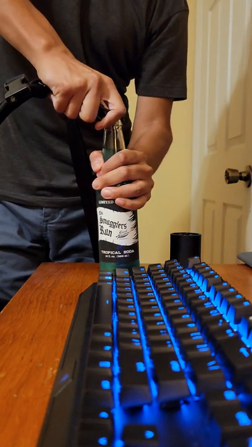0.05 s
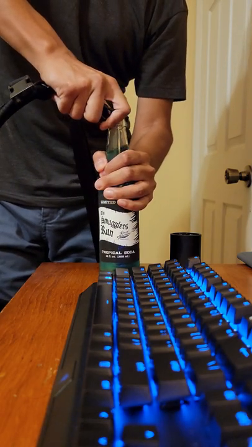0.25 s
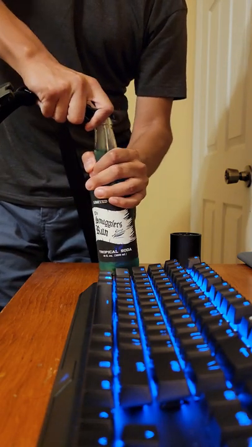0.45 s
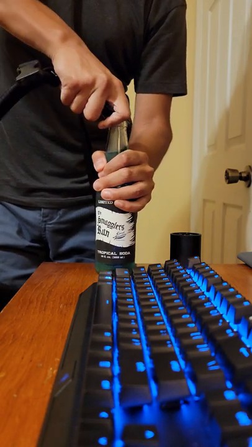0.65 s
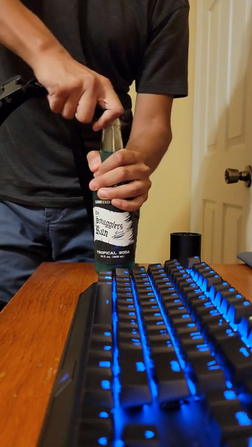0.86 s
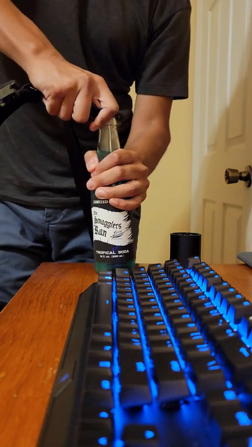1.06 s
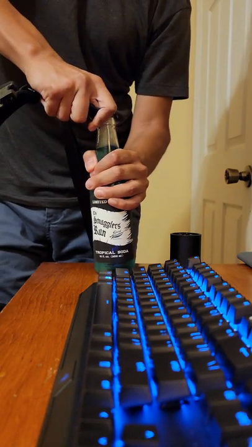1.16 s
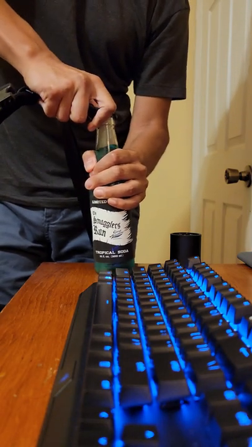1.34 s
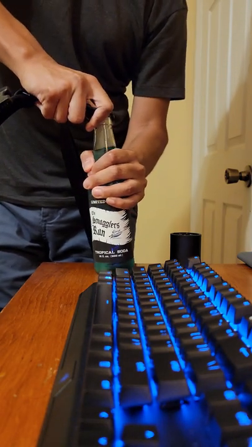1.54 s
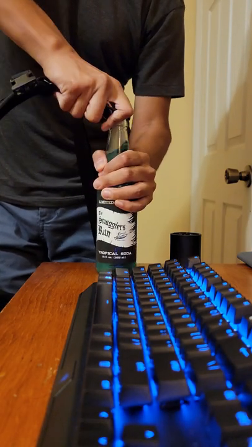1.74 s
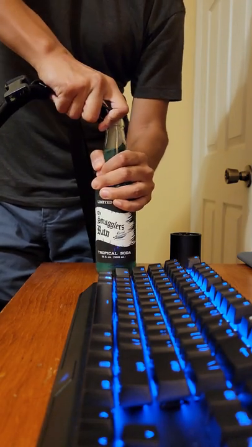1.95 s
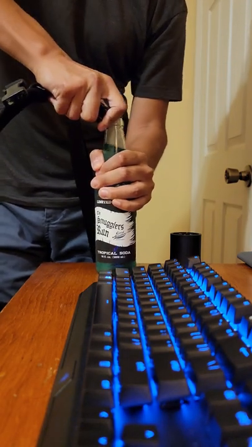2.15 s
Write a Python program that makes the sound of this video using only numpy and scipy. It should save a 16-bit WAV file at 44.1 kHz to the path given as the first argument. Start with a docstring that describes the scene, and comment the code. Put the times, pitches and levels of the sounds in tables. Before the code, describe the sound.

A glass soda bottle is opened: gas hisses briefly and bursts out with a loud, hollow pop at about 0.25 seconds. Around 0.75 seconds the metal opener clinks and the bottle knocks on a wooden desk, followed by a faint leak. At 1.75 seconds the cap snaps up with a short puff, another clink and a light knock. A fan hums faintly throughout in the small room.

```python
"""A fan hums in a small room; then gas hisses past the crown cap of a glass soda bottle and bursts out
with a pop that rings the air in the neck. A second pull of the opener lets out a faint leak, and a third
snaps the cap up with a last puff. The gas is turbulent noise, coloured by narrow ringing peaks.
The steel opener ticks and clinks, and the bottle knocks on a wooden desk, exciting its damped modes.
Nearby surfaces add early reflections, and the room a short reverberant tail."""
import sys
import numpy as np
from scipy import signal
from scipy.io import wavfile

SR = 44100
rng = np.random.default_rng(int(sys.argv[2]) if len(sys.argv) > 2 else 0)


def pcm_store(signal):
    """Save signal as 16-bit PCM."""
    levels = np.round(np.clip(np.atleast_2d(signal), -1, 1) * 32767)
    wavfile.write(sys.argv[1], SR, levels.astype(np.int16).T)


N = 97020
T = np.arange(N) / SR
EDGES_HZ = np.geomspace(22, 17000, 33)
CENTRES_HZ = np.sqrt(EDGES_HZ[1:] * EDGES_HZ[:-1])

def from_db(db):
    """Amplitude ratio: a factor of ten per 20 dB."""
    return 10 ** (np.asarray(db) / 20)

def per_band(points):
    """Interpolation over log frequency, read at the band centres."""
    hz, value = np.transpose(points)
    return np.interp(np.log(CENTRES_HZ), np.log(hz), value)

def pan(db):
    """Constant-power panning, with the left side db above the right."""
    gains = from_db([[db / 2], [-db / 2]])
    return gains / np.sqrt(np.mean(gains ** 2))

# Coherence of the sound field. Each row: frequency in Hz, left-right correlation.
COHERENCE = [(150, 0.93), (300, 0.27), (650, -0.52), (1400, -0.8), (3000, -0.23), (7000, -0.22)]
# Interchannel level difference. Each row: frequency in Hz, left minus right in dB.
BALANCE = [(100, -2.5), (200, -1.5), (400, -3.5), (1300, -5.5), (2500, -1), (5200, -5.5), (9500, 2),
           (15000, -1.5)]
def noise_bands():
    """Partially coherent stereo noise from mid and side signals: bands x 2 x N, each band of rms 1."""
    white, bands = rng.standard_normal((2, 2, N + SR // 2)), []
    for k, (alike, lean_db) in enumerate(zip(np.clip(per_band(COHERENCE), -1, 1), per_band(BALANCE))):
        bandpass = signal.butter(2, EDGES_HZ[k:k + 2], "band", fs=SR, output="sos")
        mid, side = signal.sosfilt(bandpass, white[k % 2])[:, -N:]
        pair = np.sqrt(1 + alike) * mid + np.sqrt(1 - alike) * side * [[1], [-1]]
        bands.append(pan(lean_db) * pair / pair.std())
    return np.array(bands)

def weights(spectrum, tilt_db=0):
    """Band power is density times bandwidth; the gains are scaled to a total power of 1."""
    gains = from_db(per_band(spectrum) + tilt_db * np.log2(CENTRES_HZ)) * np.sqrt(np.diff(EDGES_HZ))
    return gains / np.linalg.norm(gains)

def hiss(bands, spectrum, tilt_db=0):
    """Stationary noise by superposition of weighted bands."""
    return np.tensordot(weights(spectrum, tilt_db), bands, 1)

def shaped(bands, gains, envelopes):
    """Nonstationary noise: each band follows its own envelope."""
    return np.einsum("b,bn,bcn->cn", gains, envelopes, bands)

def age(start):
    """Seconds since start, zero before it."""
    return np.maximum(T - start, 0)

def onset(start, attack_s=.0007):
    """A first-order step response."""
    return 1 - np.exp(-age(start) / attack_s)

def burst(start, decay_s):
    """A transient: quick attack, exponential decay."""
    return onset(start) * np.exp(-age(start) / decay_s)

def ring(start, hz, t60):
    """Free vibration of a damped oscillator, falling 60 dB in t60 seconds."""
    return np.sin(2 * np.pi * hz * age(start)) * from_db(-60 * age(start) / t60)

def resonance(x, hz, width_hz):
    """Forced response of a two-pole resonator with a peak gain of 1."""
    r = np.exp(-np.pi * width_hz / SR)
    feedback = [1, -2 * r * np.cos(2 * np.pi * hz / SR), r * r]
    return (1 - r * r) / 2 * signal.lfilter([1, 0, -1], feedback, x + 1e-18)

# Fan and mains tones. Each row: frequency in Hz, rms level in dB.
HUM_TONES = [(59.2, -50.5), (118.4, -60), (145.3, -63), (251, -77), (346, -77)]
# Room noise. Each row: frequency in Hz, relative spectral density in dB.
FLOOR_SPECTRUM = [(15, -48.5), (25, -29.5), (47, -7), (70, -5), (84, -14.5), (127, -2.5), (157, -27.5),
                  (190, -20), (249, -23.5), (714, -35.5), (1230, -40), (16000, -69)]
def fan(waver=.14):
    """Fan and mains tones with slow amplitude modulation, over low noise with a faint resonance."""
    knots, hum = np.linspace(0, T[-1], num=24), 0
    for hz, db in HUM_TONES:
        tone = np.sqrt(2) * np.sin(2 * np.pi * (hz * T + rng.random()))
        drift = np.interp(T, knots, rng.standard_normal(len(knots)))
        hum += from_db(db) * tone * (1 + waver * drift)
    air = from_db(-52.5) * hiss(noise_bands(), FLOOR_SPECTRUM)
    whir = from_db(1) * resonance(air, hz=1185, width_hz=100)
    return pan(-1.2) * hum + air + whir

# Reverberation time. Each row: frequency in Hz, T60 in seconds.
ROOM_T60 = [(150, 0.55), (1000, .38), (5000, .38), (9000, .27), (15000, 0.19)]
def reverberation(x, level_db=-28, gap_s=.008):
    """Convolution with a diffuse tail, whose treble is absorbed soonest."""
    decay = from_db(-60 * T / per_band(ROOM_T60)[:, None]) * onset(gap_s)
    tail = shaped(noise_bands(), np.sqrt(np.diff(EDGES_HZ)), decay)
    tail /= np.sqrt(np.sum(tail ** 2) / 2)
    return from_db(level_db) * signal.fftconvolve(x, tail, axes=1)[:, :N]

# Echoes off desk, body and wall. Each row: left delay and right delay in seconds, gain in dB.
REFLECTIONS = [(.0011, 0.0018, -9.5), (.0046, .0039, -11), (.0083, .0097, -12), (0.0169, .0171, -16.5)]
def early_reflections(x, above_hz=1390):
    """Comb filtering: delayed treble interferes with the direct sound, differently on each side."""
    treble = signal.sosfilt(signal.butter(2, above_hz, "high", fs=SR, output="sos"), x)
    for *lags, db in REFLECTIONS:
        delayed = [np.pad(side, (int(lag * SR), 0))[:N] for side, lag in zip(treble, lags)]
        x = x + from_db(db) * np.array(delayed)
    return x

def desk_mode(start, hz, t60, lag_s=.0007, lag_above_hz=300):
    """Level and time differences place a mode to the right; high modes reach the left side late."""
    lag = lag_s / (1 + (lag_above_hz / hz) ** 4)
    lean_db = np.interp(hz, *np.transpose(BALANCE))
    return pan(lean_db) * np.array([ring(start + lag, hz, t60), ring(start, hz, t60)])

# Impacts on the desk: the jolt of the pop, then the bottle knocking twice. Each row: start in seconds, modal
# level in dB, contact cutoff in Hz, thud level in dB.
KNOCKS = [(.2625, -16.5, 260.2, -47.5), (0.7448, -24.5, 615, -27.5), (1.8107, -28.5, 1220, -30)]
# Modes of the desk. Each row: frequency in Hz, relative level in dB, T60 in seconds.
DESK_MODES = [(88, -3, .14), (147.2, 0, 0.22), (215, -4, 0.18), (253, -9, .2), (347.5, 0.5, 0.16),
              (446, -9.5, .1), (546.2, 2, .11), (620, -8.5, .1)]
# Contact noise. Each row: frequency in Hz, relative spectral density in dB.
THUD_SPECTRUM = [(30, -19.5), (70, -4.5), (150, -4.5), (380, -2.5), (650, 0), (1100, -17), (1800, -16),
                 (3500, -31.5), (8000, -58.5)]
def desk_knocks(bands, thud_s=.019):
    """Impact excitation: the pop jolts the desk and the bottle thuds on it, and a softer contact drives high
    modes less."""
    out, thud = 0, hiss(bands, THUD_SPECTRUM)
    for start, db, cutoff_hz, thud_db in KNOCKS:
        wood = sum(from_db(db + mode_db) / np.hypot(1, hz / cutoff_hz) * desk_mode(start, hz, t60)
                   for hz, mode_db, t60 in DESK_MODES)
        out += wood * onset(start) + from_db(thud_db) * thud * burst(start, thud_s)
    return out

# Slips of the opener. Each row: start in seconds, level in dB, tilt in dB per octave.
TICKS = [(0.7413, -23.5, -3.5), (0.809, -31.5, -12), (0.8409, -39.5, 7), (1.361, -65, 2), (1.43, -71, 12),
         (1.808, -30, 0), (1.855, -45, 0.5), (2.091, -67, 2), (2.117, -74, 13), (2.163, -72, 11)]
# Noise of a slip. Each row: frequency in Hz, relative spectral density in dB.
TICK_SPECTRUM = [(300, -28), (1000, 4), (1400, 11.5), (1800, -10), (2300, -2), (3100, -6), (4500, -4),
                 (8000, -15), (15000, -92)]
def opener_ticks(bands, decay_s=.003):
    """Contact transients of the opener on the cap, heavily damped by the hand."""
    return sum(from_db(db) * hiss(bands, TICK_SPECTRUM, tilt_db) * burst(start, decay_s)
               for start, db, tilt_db in TICKS)

# Slips that ring the opener. Each row: start in seconds, level in dB.
CLINKS = [(0.7426, -32.5), (0.8125, -44), (0.8443, -50.5), (0.891, -46), (1.386, -70), (1.81, -38),
          (2.044, -65.5)]
# Modes of the opener. Each row: frequency in Hz, relative level in dB, T60 in seconds.
OPENER_MODES = [(1141, -7.5, 0.058), (1616, -6.5, 0.036), (1796, 2, 0.022), (2615, -9.5, 0.032),
                (3094, -12.5, 0.064)]
def opener_clinks():
    """Free vibration: the steel rings briefly in its modes when it slips."""
    return sum(from_db(db + mode_db) * ring(start, hz, t60)
               for start, db in CLINKS for hz, mode_db, t60 in OPENER_MODES)

def opener_rub(noise, gain_db=-3):
    """Forced vibration: noise passed through the opener's modes stands for its rubbing on the cap."""
    return sum(from_db(gain_db + db) * resonance(noise, hz, width_hz=77) for hz, db, _ in OPENER_MODES)

# Soft swells of hiss and one brief scrape. Each row: peak time in seconds, level in dB,
# Gaussian rise and fall widths in seconds, tilt in dB per octave.
SWELLS = [(0.67, -66, 0.025, 0.15, 1), (0.859, -49.5, 0.11, 0.043, -3.5), (.893, -50, 0.0027, 0.0099, -0.5),
          (0.903, -57.5, 0.044, 0.046, 1.5), (1.5, -68, 0.04, 0.017, -2), (1.94, -61.5, 0.059, 0.041, -1),
          (2.06, -64.5, 0.039, .03, -3.5)]
# Noise of the swells. Each row: frequency in Hz, relative spectral density in dB.
SWELL_SPECTRUM = [(150, 1), (350, 14.5), (800, 5), (1700, 6), (2600, 5), (4200, -3.5), (6500, 1.5),
                  (9000, -36), (11500, -12), (15000, -16)]
def hiss_and_scrape(bands, fizz_db=4, spurt_s=.0019):
    """Random amplitude modulation makes soft swells of hiss and one brief scrape splutter."""
    spurts = np.interp(T / spurt_s, np.arange(N), rng.uniform(-1, 1, N))
    out = 0
    for peak, db, rise, fall, tilt_db in SWELLS:
        swell = np.exp(-.5 * ((T - peak) / np.where(T < peak, rise, fall)) ** 2)
        out += from_db(db) * swell * hiss(bands, SWELL_SPECTRUM, tilt_db)
    return out * from_db(fizz_db * spurts)

# Releases of the crimp. Each row: start in seconds, crack and puff levels in dB,
# tilt in dB per octave, left minus right in dB.
SNAPS = [(1.7507, -20.5, -30.5, -0.37, -3), (1.7616, -20.5, -31, 0.4, 1.5)]
# Noise of a snap. Each row: frequency in Hz, relative spectral density in dB.
SNAP_SPECTRUM = [(70, -45), (170, -12.5), (380, 5), (900, -3.5), (1350, 2.5), (2000, -6), (3200, -0.5),
                 (4700, -8), (6000, -4), (9000, -18), (12000, -21), (15500, -17)]
def cap_snaps(bands, crack_s=.0028, fall_db_per_s=340):
    """Sudden release of stress: the crimp yields in two steps, each a crack and a puff of gas."""
    out = 0
    for start, crack_db, puff_db, tilt_db, pan_db in SNAPS:
        crack = from_db(crack_db) * burst(start, crack_s)
        puff = onset(start) * from_db(puff_db - fall_db_per_s * age(start))
        out += pan(pan_db) * hiss(bands, SNAP_SPECTRUM, tilt_db) * (crack + puff)
    return out

# Narrow ringing peaks that colour the hiss. Each row: frequency in Hz, gain in dB.
HISS_PEAKS = [(3483, -5), (3690, -3.5), (4025, 2), (4255, 5.5), (4738, -4.5), (5305, -2), (5487, -7),
              (6052, 7.5), (6208, 1), (9499, 3.5), (10144, 5.5), (10645, 6), (12619, 3.5), (13989, 4.5)]
def ringing_peaks(noise):
    """Resonant filtering: narrow ringing peaks colour the hiss."""
    return noise + sum(from_db(db) * resonance(noise, hz, width_hz=30) for hz, db in HISS_PEAKS)

# Pressure pulses in the neck. Each row: start in seconds, level in dB.
NECK_PULSES = [(0.2519, -27), (0.2598, -12), (1.7506, -24), (1.762, -33)]
# Modes of the enclosed air. Each row: frequency in Hz, relative level in dB, T60 in seconds.
NECK_MODES = [(1293, 0, .14), (1255, -12, .1), (1360, -7, .06)]
def neck(left_lag_s=.00025):
    """Cavity resonance: pressure pulses draw a hollow note from the air above the drink."""
    sides = [sum(from_db(db + mode_db) * ring(start + lag, hz, t60)
                 for start, db in NECK_PULSES for hz, mode_db, t60 in NECK_MODES)
             for lag in (left_lag_s, 0)]
    return pan(-1.5) * np.array(sides)

POP_S, POP_CRACK_S = .259, .002   # when the seal gives way, and the time constant of its crack
# Hiss at its height. Each row: frequency in Hz, relative spectral density in dB.
SQUEEZE_SPECTRUM = [(80, -3.5), (400, -9.5), (900, -10), (2500, -10.5), (5000, -3), (7000, 0), (9000, -11),
                    (11000, -6), (13500, -5), (15500, 2)]
# Growth of the hiss. Each row: frequency in Hz, rise in dB per second.
SQUEEZE_RISE = [(200, 812), (2500, 725), (5000, 658), (8800, 465.5), (11000, 554.5), (15000, 559.5)]
def squeeze(bands, start_s=.166, level_db=-17.5):
    """A turbulent jet under the lifting seal swells until the pop, spreading from the treble down."""
    swell = from_db(-per_band(SQUEEZE_RISE)[:, None] * np.maximum(POP_S - T, 0)) * onset(start_s)
    jet = shaped(bands, weights(SQUEEZE_SPECTRUM), swell) * np.exp(-age(POP_S) / POP_CRACK_S)
    whistle = resonance(jet, hz=8495, width_hz=450)   # the narrow gap sings faintly
    return from_db(level_db) * (jet + whistle)

# Gas at full flow. Each row: frequency in Hz, relative spectral density in dB.
POP_SPECTRUM = [(25, -16), (70, -2), (200, -5.5), (400, -6.5), (900, -10.5), (1800, -12.5), (2750, -18),
                (4200, -11.5), (6200, -12.5), (8300, -31.5), (11000, -24), (14000, -24.5), (15700, -18.5)]
# Decay of the flow noise. Each row: frequency in Hz, fall in dB per second.
POP_FALL = [(80, 380), (200, 270), (500, 292), (2000, 320.5), (5000, 293.5), (9000, 385.5), (15000, 421)]
def pop(bands, level_db=-17, overshoot_db=11.5, hold_s=.02):
    """Sudden decompression: the flow overshoots, holds briefly and dies as the pressure drops."""
    fall = from_db(-per_band(POP_FALL)[:, None] * age(POP_S + hold_s))
    flow = shaped(bands, weights(POP_SPECTRUM), fall) * onset(POP_S)
    return flow * from_db(level_db + overshoot_db * burst(POP_S, POP_CRACK_S))

def scene():
    """Superposition of gas, opener, desk and neck with their reverberation and the fan."""
    air, contact = noise_bands(), noise_bands()
    swells = hiss_and_scrape(air)
    cap = early_reflections(ringing_peaks(squeeze(air) + pop(air) + cap_snaps(air) + swells))
    bottle = cap + opener_rub(swells) + desk_knocks(contact) + opener_ticks(contact) + opener_clinks()
    note = neck()
    tail = reverberation(bottle + from_db(-10) * note)   # the neck feeds the room less than the hiss
    return bottle + note + tail + fan()

def record(dry, peak_limit=.85, cutoff_hz=15900):
    """Hard clipping of the peaks, then band limiting by a steep low-pass."""
    lowpass = signal.ellip(12, .2, 80, cutoff_hz, fs=SR, output="sos")
    return signal.sosfilt(lowpass, np.clip(dry, -peak_limit, peak_limit))

dry = scene()
out = record(dry)
pcm_store(out)
```